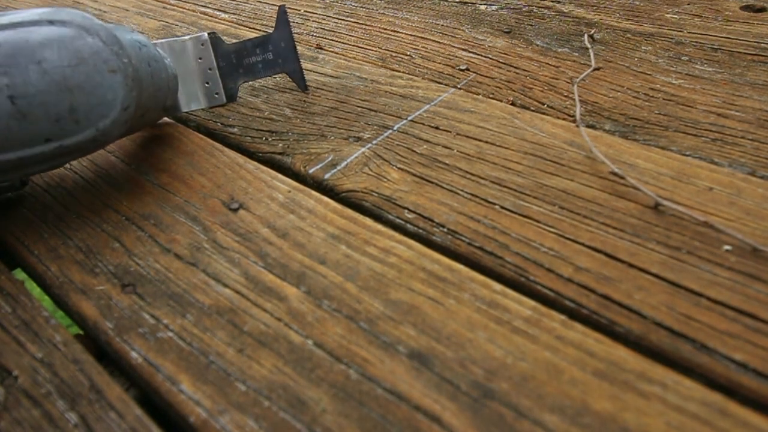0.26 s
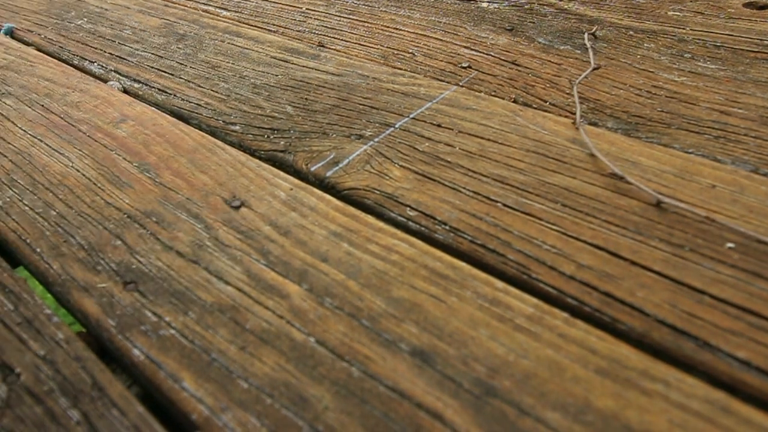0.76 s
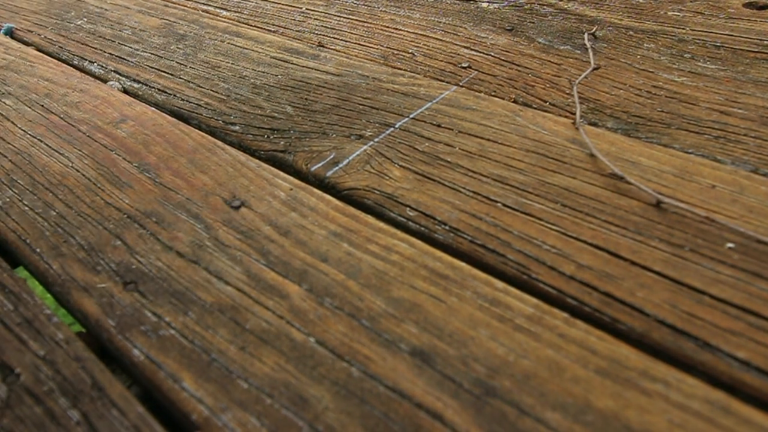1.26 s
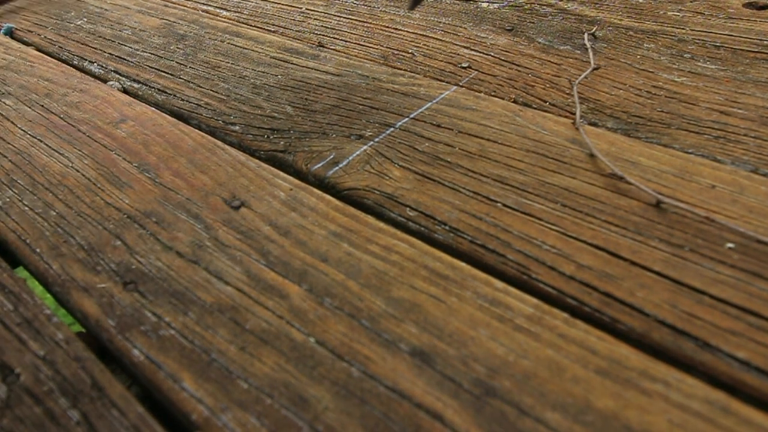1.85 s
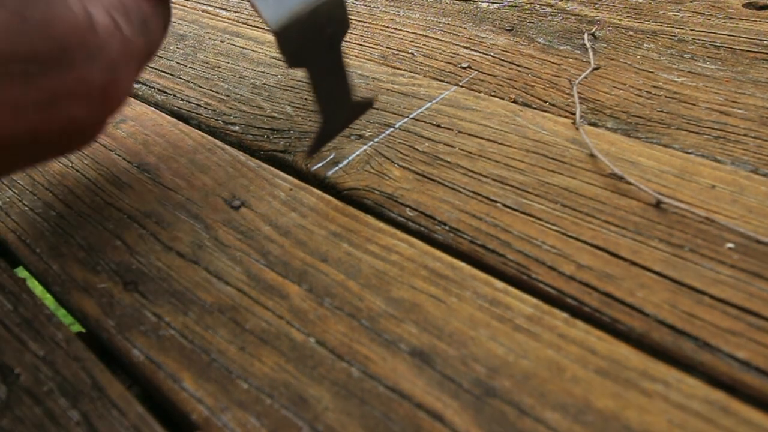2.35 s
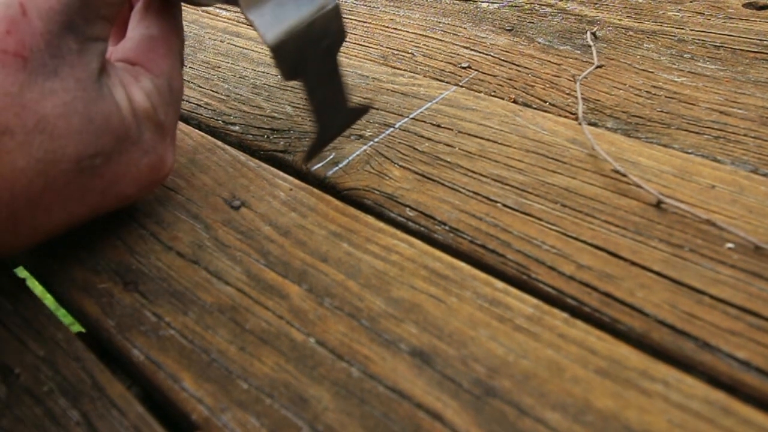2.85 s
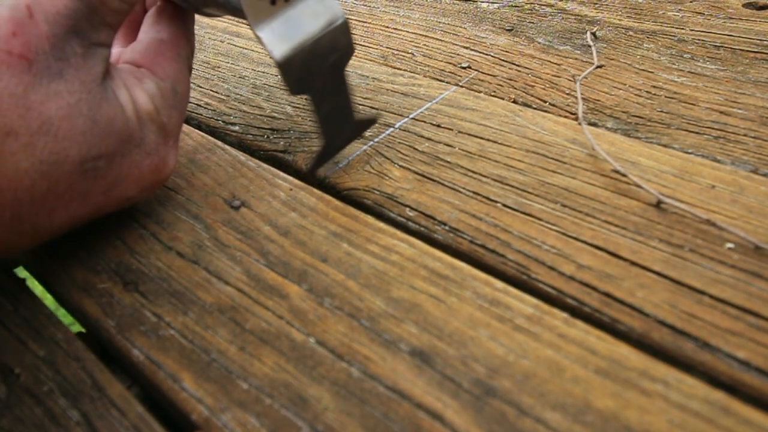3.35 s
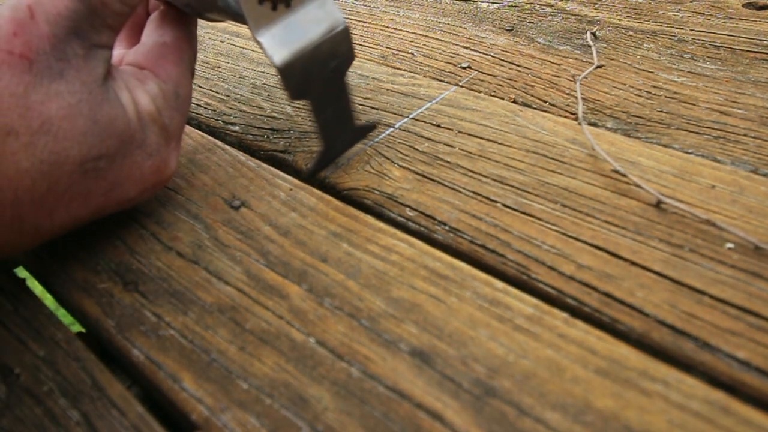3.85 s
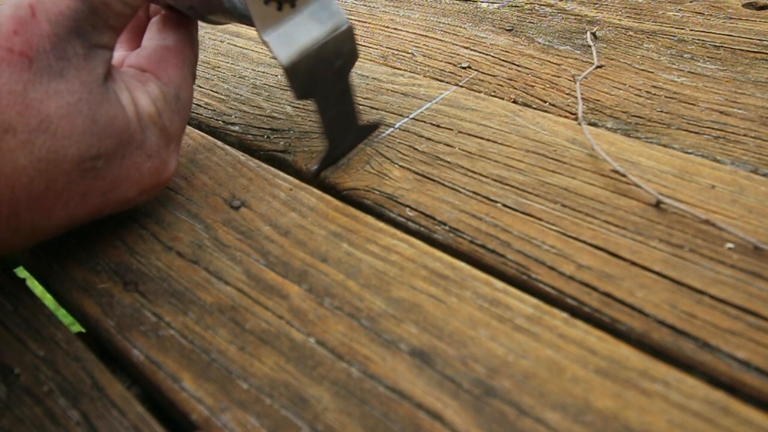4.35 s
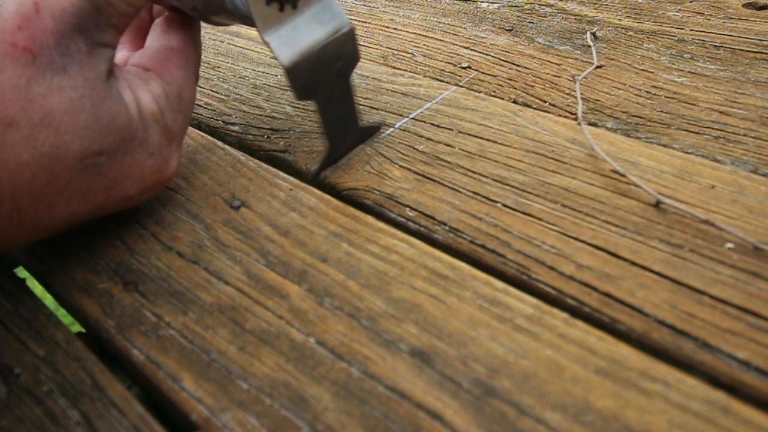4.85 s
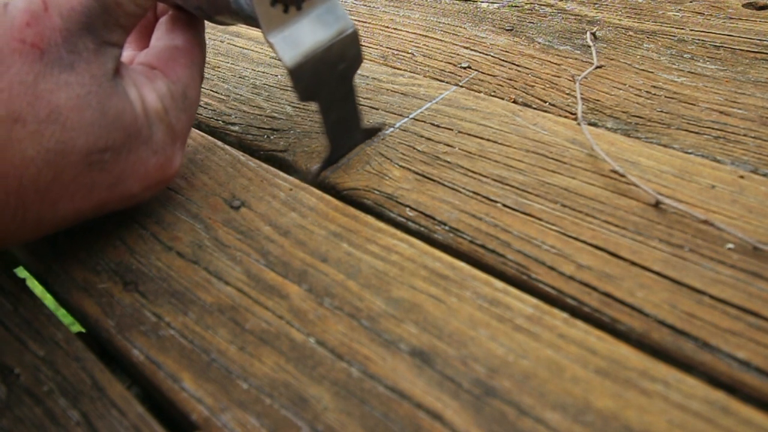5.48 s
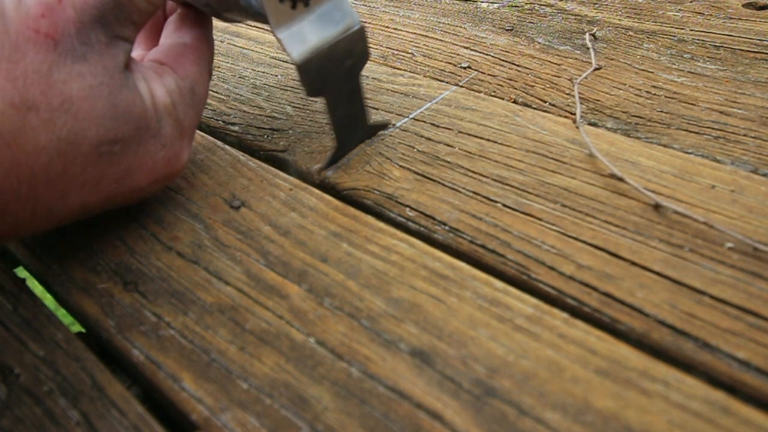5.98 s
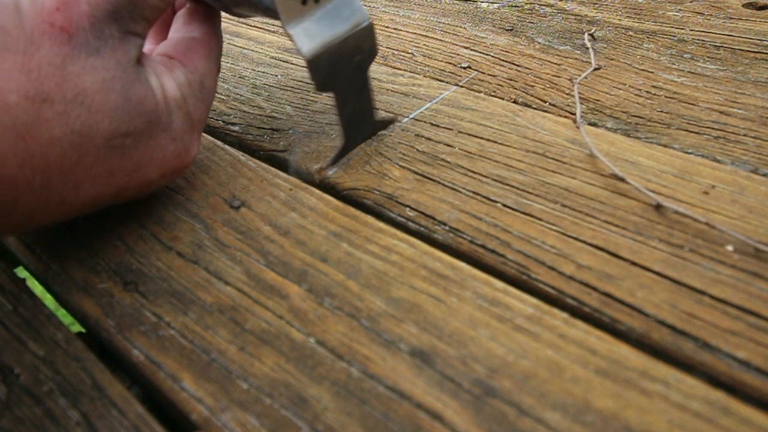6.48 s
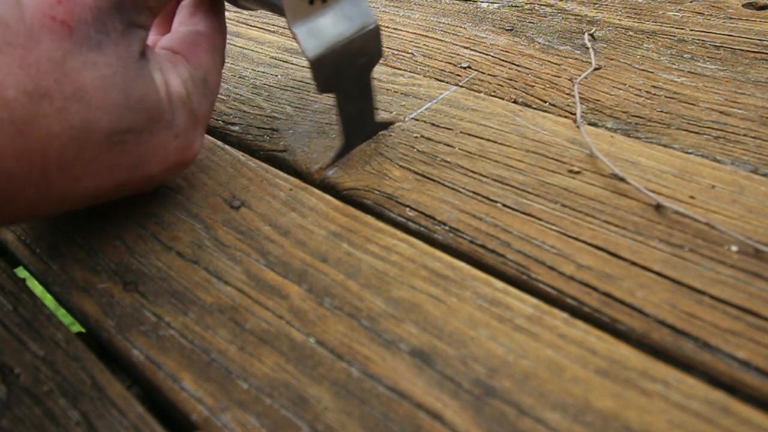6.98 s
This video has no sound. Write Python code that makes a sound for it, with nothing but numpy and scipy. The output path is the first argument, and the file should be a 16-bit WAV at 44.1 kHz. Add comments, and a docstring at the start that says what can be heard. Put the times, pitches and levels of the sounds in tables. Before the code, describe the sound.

Outdoors and very close, the first 0.6 seconds are quiet: low rumble, thin rustle, tiny scrapes and squeaks, a faint bird chirp and several light knocks on wood. At about 0.62 a power multi-tool jerks on and its buzz sweeps upward, steeply at first, settling by 1.5 to 2 seconds into a fast, bright, metallic drone with rattle, airy hiss and a thin high whine, single overtones singing out as it rises. It starts toward the left and moves nearer the middle. Around 1.6 it brightens as the blade turns. At 2.02 a hand knocks firmly on the deck. The blade bites near 3.5; from 4 the pitch sags, roughly a quarter lower by 6, while the board hums. From 5.4 to 5.9 the blade wedges and the buzz tightens into hard, regular slaps. At 6.9 it loosens, slightly faster and hissier, still running at about 7.2.

```python
"""An oscillating multi-tool is switched on and plunged into a deck board, outdoors and close by.
Stroke harmonics make its buzz and hum, noise bursts its rattle and hiss, a high multiple its commutator whine.
As the blade sinks the motor sags, the strokes tighten towards one slap each and the board hums.
A hand knocks on the deck (decaying board modes); filtered noise makes a background that drops at switch-on."""
import sys
import numpy as np
from scipy import signal
from scipy.fft import rfft, irfft, next_fast_len
from scipy.io import wavfile
from scipy.ndimage import uniform_filter1d

SR = 44100
rng = np.random.default_rng(int(sys.argv[2]) if len(sys.argv) > 2 else 0)


def inscribe(sig):
    """Save sig as 16-bit PCM at rate SR to the path in sys.argv[1].

    A 1-D sig is mono; a 2-D sig holds one channel per row.
    Samples are clipped to [-1, 1] before scaling.
    """
    pcm = np.round(np.clip(np.atleast_2d(sig).T, -1, 1) * 32767)
    wavfile.write(sys.argv[1], SR, pcm.astype(np.int16))


N = 318402
TIME = np.arange(N) / SR  # s

# Levels in the tables are starting points: layer trims, slow wander and panning come on top.
# Background before the start: (time [s], rumble [dB], rustle [dB])
BACKGROUND_LEVEL = [(0, -33.5, -41.5), (.15, -39.5, -41.5), (.2, -36.5, -46.5), (.28, -37, -47.5),
                    (.34, -38.5, -45.5), (.6, -38.5, -50.5)]
# Colour of the background rumble: (frequency [Hz], relative level [dB])
RUMBLE_COLOUR = [(20, 5), (33, -3), (54, -22), (88, 3.5), (125, -7), (350, -5.5), (1000, -14),
                 (2000, -36.5)]
# Colour of the background rustle: (frequency [Hz], relative level [dB])
RUSTLE_COLOUR = [(400, -39), (1100, -1.5), (2200, -7.5), (5000, -11.5), (8000, -17), (15000, -22)]
# Short scrapes and squeaks, and a bird's faint chirp near 3.8 kHz:
# (peak time [s], swell length [s], centre [Hz], width [Hz], level [dB])
SCRAPES_AND_CHIRP = [(0.11, 0.13, 1255, 41, -49), (0.088, 0.15, 3187, 130, -53),
                     (.09, 0.083, 3962, 500, -48), (.407, .01, 9800, 2000, -42.5),
                     (0.42, 0.045, 5300, 6000, -48), (0.58, 0.014, 3800, 40, -54)]

# Knocks on the deck: (time [s], level [dB], softness, twice the rise time of the push [ms])
KNOCKS = [(0.038, -19.5, 0.16), (.177, -23.5, 0.86), (.194, -28, .15), (0.245, -24, 0.22),
          (0.56, -29, 0.14), (2.024, -6, 0.2), (2.046, -20, 1.3)]
# Modes of the board: (frequency [Hz], relative level [dB], t60 [s])
BOARD_MODES = [(87, -20, 0.6), (134, -19, 0.2), (285, -1.5, 0.073), (370, 0, 0.037), (537, 2, 0.028),
               (670, 5, 0.026), (914, 8.5, 0.033), (1064, 9, 0.018)]

ON_S = .6235  # switch-on, s
FREE_HZ = 315.1  # full speed in the air, strokes per second
# The motor gathers speed in a jerk, a rush and a creep: (still to gain at switch-on [Hz], time constant [s])
SPIN_UP = [(40.1, .028), (137.03, .221), (25.36, .8)]
# Pressure of the cut: (time [s], stroke rate lost [Hz])
SAG = [(3.4, 0), (3.83, 2.05), (4.15, 10.5), (4.34, 13.5), (4.66, 29.5), (5.18, 47), (5.42, 63),
       (5.86, 75.5), (6.2, 75), (6.38, 78.5), (6.68, 81.5), (6.95, 72), (7.22, 76)]
MAX_STRAIN = 0.39  # limit on the share of full speed still to gain
# Blade depth: (time [s], depth [0 free in the air, 1 teeth biting, 2 buried])
DEPTH = [(3.44, 0.05), (3.53, 0.54), (3.7, .9), (4.1, 1.026), (5.2, 1.41), (5.45, 1.92), (6.87, 1.95),
         (6.93, 1.86)]
# Where the tool stands, narrowed or widened per layer: (time [s], left minus right [dB])
PLACE = [(.7, 10.5), (1.7, 5.5), (7.2, 3.5)]

# The blade is turned towards the listener: (start [s], length [s])
TURN = (1.573, 0.056)
# The hand settles on the deck and couples the tool to it: (start [s], length [s])
BRACE = (1.95, 0.38)
# The blade wedges in the cut and slaps the wood once a stroke: (start [s], length [s])
WEDGE = (5.37, 0.54)
# The pressure eases and the blade comes loose at once: (start [s], length [s])
RELEASE = (6.88, .05)
SLAP_LOCK = .52  # how far the wedged harmonics fall into step, 0-1
SLAP_SMEAR = .003  # phase lag from the board, cycles per harmonic number squared
WEDGED_BED = .24  # steady noise between the slaps, relative to their mean power

# Rocking tool and board: (stroke harmonic, free [dB], biting [dB], buried [dB],
# gained once turned [dB], gained once braced [dB])
HUM = [(1, -51, -52, -49.5, -4, 6), (2, -50, -52.5, -48.5, -6.5, 8), (3, -35.5, -27, -54, -4, -2.5),
       (4, -35.5, -43.5, -34, 3.5, 0.5)]
# A bearing cage circles at .42 of the shaft speed and, with the catching teeth, puts tones between
# the harmonics: (multiple of shaft speed, free [dB], biting [dB], buried [dB])
CAGE = [(.42, -85, -72.5, -55.5), (0.579, -77.5, -71.5, -62), (1.49, -64, -44, -96),
        (2.58, -47.5, -64, -67), (4.42, -40.5, -44, -82), (4.58, -39, -42, -67)]
# The circling cage makes strong and weak strokes: (free [share], biting [share], buried [share])
BEAT = (0.21, 0.23, 0.16)
# Deck resonances that the hum glides through: (frequency [Hz], width [Hz], lift [dB])
DECK_MODES = [(230.1, 28.4, 16), (314, 35, 7), (470.6, 26, 13.5), (549, 27, 5.5), (763, 40, 16.5)]
# The same in the body of the tool: (frequency [Hz], width [Hz], lift [dB])
BODY_MODES = [(700, 93, 7.5), (1245, 22.5, 6.8)]

# Buzz of the drive: (stroke harmonic, free [dB], biting [dB], buried [dB]), all relative
BUZZ = [(4.64, -26, -4, -11), (4.85, -8, -7, -13), (5.9, -12, -13, -5.5), (7.1, -14.5, -13.5, -9),
        (8.2, -15.5, -10.5, -9), (8.74, -8, -8.5, -14), (10.16, -14, -13.5, -12), (10.9, -13, -12.5, -14.5),
        (12.3, -15, -9, -10.5), (12.93, -13, -20, -13), (14, -22, -15, -17), (15.2, -10, -20, -10.5),
        (16, -8.5, -20, -10), (17, -10.5, -11, -22), (18.3, -9, -14.5, -22), (18.3, -14.5, -10, -9.5),
        (20.8, -16, -21, -12.5), (23.1, -17, -21, -10), (25.2, -21, -22, -16.5), (30, -17, -22, -19),
        (32.7, -12.5, -25, -19), (38, -22, -22, -21), (44.5, -26, -48, -15), (47, -45, -50, -20),
        (58.3, -49, -49, -48)]
# High ring of the buried blade: (frequency [Hz], width [Hz], lift [dB])
BURIED_MODES = [(10440, 290, 7)]
# One harmonic catches a resonance and sings, or slips off it and drops out:
# (start [s], end [s], stroke harmonic, lift [dB])
SINGS = [(.95, 1.12, 11, 5), (.97, 1.602, 9, 4.5), (0.996, 1.273, 8, 6.5), (.98, 1.142, 13, 8),
         (1.134, 1.576, 4, 4), (1.137, 1.25, 14, 7.5), (1.257, 1.56, 11, 6), (1.3, 1.46, 16, 8),
         (1.504, 1.783, 6, 3), (1.69, 1.95, 4, 3.5), (1.72, 2.147, 8, 12), (1.74, 1.934, 11, 11),
         (1.896, 2.618, 10, 6.5), (2.1, 2.398, 11, 7.5), (2.2, 2.45, 17, 3), (3.605, 3.82, 11, 7),
         (3.88, 4.05, 10, 7.5), (4.14, 4.477, 7, 9), (4.22, 4.38, 14, 5), (4.5, 4.803, 11, 8),
         (4.705, 5.266, 2, 6), (4.7, 5.277, 8, 4), (4.875, 5.2, 6, 5), (5.315, 5.46, 6, 7),
         (6.2, 6.48, 8, 3), (6.24, 6.356, 13, 9), (6.4, 6.76, 6, 1.5), (6.897, 7.2, 13, 3),
         (6.915, 7.3, 4, -7), (6.933, 7.25, 9, 6.5), (6.995, 7.3, 3, 7)]
CATCH_S = 0.08  # time to catch a resonance or let it go, s
HUM_DRIFT_DB, BUZZ_WANDER_DB = .8, 1.2  # slow wander of each harmonic, dB

# Rattle colour of the housing: (frequency [Hz], relative level [dB])
HOUSING = [(60, -37), (200, -20), (310, -18), (470, -8.5), (610, -11), (800, -1), (1200, 1), (2200, -2.5),
           (3600, 0.5), (5000, -2), (6200, -7.5), (8000, -15)]
# Housing resonances: (frequency [Hz], width [Hz], lift [dB])
HOUSING_MODES = [(710, 120, -3), (1409, 44, 3.5), (3876, 47, 6.5), (2250, 650, 4), (3057, 120, 5),
                 (4190, 117, 6)]
# Hiss of blade and cooling air: (frequency [Hz], relative level [dB])
HISS = [(3500, -29), (5000, 0.5), (6000, -0.5), (7700, -1.5), (9300, 0), (10600, 1), (12000, -6.5),
        (14000, -11), (16000, -26)]
# Blade resonances: (frequency [Hz], width [Hz], lift [dB])
BLADE_MODES = [(6020, 33, 7), (8550, 120, 7), (12500, 110, 3)]
# The wood damps some blade rings and brings out others:
# (frequency [Hz], width [Hz], free [dB], biting [dB], buried [dB])
GRIP_RINGS = [(2206, 920, -30, -30, -41.5), (2970, 200, -40, -33, -39), (4224, 200, -39, -34, -51),
              (6020, 81, -51, -33, -81), (10300, 570, -42, -60, -43)]
# Changing speed and grip make tool and blade shudder:
# (peak time [s], swell length [s], centre [Hz], width [Hz], level [dB])
SHUDDERS = [(.65, 0.02, 1180, 160, -28), (.68, 0.032, 880, 110, -25.5), (.712, 0.02, 1050, 110, -29),
            (.755, 0.039, 3130, 220, -24.5), (.95, 0.15, 3560, 700, -25.5), (.98, 0.068, 2350, 345, -26),
            (1.1, 0.043, 6020, 70, -33), (4.91, 0.088, 2250, 200, -28.5), (5.51, 0.13, 5400, 1000, -28),
            (7.06, 0.14, 7000, 700, -32), (7.16, 0.097, 5500, 600, -30)]
# Resonances that the commutator whine glides through: (frequency [Hz], width [Hz], lift [dB])
WHINE_MODES = [(9870, 140, 13), (10700, 700, -3), (10900, 330, 7)]
WHINE_ORDER, TOP_ORDER = 36, 62  # multiple of shaft speed; the buzz stops below the second
TOP_HZ = 15900  # upper edge of the sound, Hz

# Buzz level: (free [dB], biting [dB], buried [dB], gained per unit of strain [dB], gained once turned [dB])
BUZZ_LEVEL = (-25.5, -26, -24.5, -62, -0.5)
# Rattle level: (free [dB], biting [dB], buried [dB], per unit of strain [dB], once turned [dB])
RATTLE_LEVEL = (-29, -28.5, -30, 25, 2.5)
# Hiss level: (free [dB], biting [dB], buried [dB], per unit of strain [dB], once turned [dB])
HISS_LEVEL = (-33.5, -32, -33, 16, 3)
# Whine level: (free [dB], biting [dB], buried [dB], per unit of strain [dB], once turned [dB])
WHINE_LEVEL = (-46.5, -48.5, -60, 39, 8)
# Bouts of blade chatter: (peak time [s], swell length [s], more buzz [dB], more rattle [dB], more hiss [dB])
CHATTER = [(0.963, 0.018, 8, 2, 5), (1.035, 0.034, 5.5, -10, 7.5), (1.302, 0.24, 0.5, -1, 3),
           (1.687, 0.046, 1, 1, 2), (1.8, 0.033, 1, 3, 1), (4.812, 0.12, -0.5, 1.5, 2.5),
           (5.46, 0.2, 0, 4, 3), (5.93, 0.29, 0, 0, 3.5), (7.135, 0.24, -0.5, 0.5, 4.5)]


def undb(db):
    """Decibels to gain."""
    return 10 ** (np.asarray(db) / 20)


def curves(table):
    """Each column of a table of times, joined by straight lines."""
    s, *columns = np.transpose(table)
    return [np.interp(TIME, s, column) for column in columns]


def unit(x):
    """Scale to rms 1."""
    return x / np.sqrt(np.mean(x ** 2))


def lift(f, modes):
    """dB that a set of resonances adds at frequency f."""
    return sum(db / (1 + (2 * (f - centre) / width) ** 2) for centre, width, db in modes)


def colour(x, points, modes=()):
    """Filter by a smooth spectrum with resonances on top; rms 1."""
    size = next_fast_len(N, real=True)
    f = np.maximum(np.arange(size // 2 + 1) * SR / size, 1)
    hz, db = np.transpose(points)
    shape_db = np.interp(np.log(f), np.log(hz), db) + lift(f, modes)
    return unit(irfft(rfft(x, size) * undb(shape_db), size)[..., :N])


def walk(rate):
    """Random wander with a spread near 1, taking a new heading rate times a second."""
    knots = rng.standard_normal(4096)
    # the root makes up for the spread lost between knots
    return np.interp(TIME * rate, np.arange(len(knots)), knots) * np.sqrt(3 / 2)


def spread(x, pan_db):
    """Place a sound between left and right, keeping the mean of both gains."""
    right = 2 / (1 + undb(pan_db))
    return x * np.vstack([2 - right, right])


def pair(apart):
    """Left and right noise that is partly unrelated."""
    mid, side = rng.standard_normal((2, N))
    return np.array([mid + apart * side, mid - apart * side])


def swell(s, length):
    """A bell that peaks at time s and falls to 1/e one length away."""
    return np.exp(-np.minimum(((TIME - s) / length) ** 2, 50))


def rings(table):
    """Resonant bands of noise that swell and die."""
    out = np.zeros(N)
    for s, length, hz, width, db in table:
        ring = signal.lfilter(*signal.iirpeak(hz, hz / width, SR), rng.standard_normal(N))
        ring = signal.lfilter(*signal.iirpeak(hz, hz / width / 2, SR), ring)
        out += unit(ring) * undb(db) * swell(s, length)
    return out


def move(start, length):
    """A move of the hand, from 0 before it to 1 after."""
    return np.clip((TIME - start) / length, 0, 1)


def background(rumble_db=-1, rustle_db=0, after_db=-29):
    """Low rumble, rustle, short scrapes and a faint chirp, all filtered noise, turned down as the tool starts."""
    low_db, high_db = curves(BACKGROUND_LEVEL)
    rumble = colour(pair(0.78), RUMBLE_COLOUR) * undb(low_db + rumble_db)
    crackle = pair(0.85) * undb(1.1 * walk(143))
    rustle = colour(crackle, RUSTLE_COLOUR) * undb(high_db + rustle_db)
    drop_db = np.interp(TIME, [ON_S, ON_S + 0.058], [0, after_db])
    return spread(rumble + rustle + rings(SCRAPES_AND_CHIRP), 2.4) * undb(drop_db)


def knocks(pan_db=3, skew=1.64, shiver=0.46):
    """Blows ring the board, each mode differently at each ear; a softer blow leaves only the low modes."""
    out, t = np.zeros((2, N)), TIME[:SR // 2]
    bass_cut = signal.butter(2, 215, "high", fs=SR, output="sos")
    for s, db, soft_ms in KNOCKS:
        ring = 0
        for hz, mode_db, t60 in BOARD_MODES:
            ear_phase = skew * rng.standard_normal((2, 1))
            decay = np.exp(-np.log(1000) * t / t60)
            ring = ring + undb(mode_db) * np.sin(2 * np.pi * hz * t + ear_phase) * decay
        # the loose board shivers on its joists
        ring *= 1 + shiver * walk(171)[:len(t)]
        push = t * np.exp(-t * 2000 / soft_ms)
        blow = signal.fftconvolve(ring, push[None])[:, :len(t)]
        # a narrow plank radiates little bass
        blow = signal.sosfilt(bass_cut, blow)
        start = int(s * SR)
        out[:, start:start + len(t)] += undb(db) * blow / np.abs(blow).max()
    return spread(out, pan_db)


def motor():
    """Strokes per second, and the strain: the share of full speed still to gain in the spin-up, limited."""
    age = np.maximum(TIME - ON_S, 0)
    short_hz = sum(gain * np.exp(-age / lag) for gain, lag in SPIN_UP)
    return FREE_HZ - short_hz - curves(SAG)[0], np.minimum(short_hz / FREE_HZ, MAX_STRAIN)


def by_depth(depth, db):
    """Blend the free, biting and buried values."""
    return np.interp(depth, np.arange(len(db)), db)


def effort(depth, strain):
    """dB of buzz, rattle, hiss and whine, from depth of cut, spin-up strain, the turn and the chatter."""
    turned = move(*TURN)
    levels = [by_depth(depth, db) + strain_db * strain + turn_db * turned
              for *db, strain_db, turn_db in (BUZZ_LEVEL, RATTLE_LEVEL, HISS_LEVEL, WHINE_LEVEL)]
    for s, length, *more_db in CHATTER:
        bout = swell(s, length)
        for layer, db in enumerate(more_db):
            levels[layer] += db * bout
    return levels


def wedged():
    """Rises to 1 as the blade wedges in the cut, and drops to 0 as it comes loose."""
    return move(*WEDGE) - move(*RELEASE)


def sing(k):
    """dB that stroke harmonic k gains or loses as it catches a resonance or slips off it."""
    return sum(db * (move(start - CATCH_S / 2, CATCH_S) - move(end - CATCH_S / 2, CATCH_S))
               for start, end, order, db in SINGS if round(order) == k)


def partial(turns, order, lead=0):
    """A sine at a multiple of shaft speed, left ear ahead by lead radians; wedging pulls it towards step."""
    start = rng.uniform(-np.pi, np.pi) * (1 - SLAP_LOCK * wedged())
    start = start - 2 * np.pi * SLAP_SMEAR * order ** 2
    angle = 2 * np.pi * (order * turns % 1) + start + lead * np.array([[.5], [-.5]])
    return np.sqrt(2) * np.sin(angle.astype(np.float32))


def rattle(turns, scatter_db, fade_s, slop=.12, bed=0.3, return_db=-8.7, wedged_slop=0.047, wedged_return_db=-12):
    """Envelope of uneven strikes at both ends of each stroke, dying exponentially; wedging steadies them."""
    tight = wedged()
    count = np.arange(2 * int(turns[-1])) / 2  # strokes, in halves
    timing, force = rng.standard_normal((len(count), 2)).T
    held = np.interp(count, turns, tight)
    struck = count + np.interp(held, [0, 1], [slop, wedged_slop]) * timing
    at = np.interp(struck, turns, np.arange(N)).astype(int)
    # the return half of the stroke strikes more weakly
    back_db = np.interp(held, [0, 1], [return_db, wedged_return_db]) * (count % 1 > 0)
    strikes = np.zeros(N)
    strikes[at] = undb(scatter_db * np.minimum(force, 1.3) + back_db) ** 2
    power = signal.lfilter([1], [1, -np.exp(-1 / (fade_s * SR))], strikes)
    return np.sqrt(np.interp(tight, [0, 1], [bed, WEDGED_BED]) + power / power.mean())


def clatter(strikes, level_db):
    """The strikes shake noise through the resonances of the housing."""
    return colour(pair(0.54) * strikes, HOUSING, HOUSING_MODES) * undb(level_db + 0.06 + 1.46 * walk(30))


def blade_hiss(strikes, level_db):
    """Blade and cooling air: high noise pulsed by the strikes, with the blade's resonances."""
    return colour(pair(0.42) * strikes, HISS, BLADE_MODES) * undb(level_db + 1.23 + 0.72 * walk(18))


def grip_rings(strikes, depth):
    """The strikes ring the blade; which rings last depends on how deep the wood holds it."""
    out, source = 0, pair(0.15) * strikes
    for hz, width, *db in GRIP_RINGS:
        band = signal.iirpeak(hz, hz / width / 1.2, SR)
        ring = signal.lfilter(*band, signal.lfilter(*band, source))
        out = out + unit(ring) * undb(by_depth(depth, db))
    return out


def commutator_whine(turns, hz, level_db):
    """Brushes on the commutator sing at a high multiple of shaft speed, unsteady in pitch and level."""
    # the brushes bounce most while the motor is still gathering speed
    bounce = np.interp(TIME, [1, 1.8], [2, 1])
    tone = partial(turns + .002 * bounce * walk(250), WHINE_ORDER)
    tone = tone * undb(2 * bounce * (walk(40) - .3))
    return tone * undb(level_db + lift(WHINE_ORDER * hz, WHINE_MODES))


def hum(turns, hz, depth, pan_db, waver_db=1.36, low_pan=0.77, cage_waver_db=3.5, cage_pan_db=8):
    """Tool and board rock at the lowest stroke harmonics, with the bearing cage's tones between them."""
    # the board bends in another shape as the speed falls, which turns the fundamental between the ears
    leads = [np.interp(hz, [240, 295], [-.6, 1.15]), 0, .3, -.3]  # radians
    turned, braced = move(*TURN), move(*BRACE)
    out = 0
    for (order, *db, turn_db, brace_db), lead in zip(HUM, leads):
        k = round(order)
        level = by_depth(depth, db) + lift(k * hz, BODY_MODES) + turned * turn_db + sing(k)
        level += braced * (brace_db + lift(k * hz, DECK_MODES))
        tone = partial(turns, k, lead) * undb(level + waver_db * walk(25) + HUM_DRIFT_DB * walk(4.6))
        out = out + spread(tone, pan_db * (low_pan if k <= 2 else 1.5))
    for order, *db in CAGE:
        tone = partial(turns + 0.031 * walk(30), order)
        tone = tone * undb(by_depth(depth, db) + cage_waver_db * walk(12))
        out = out + spread(tone, cage_pan_db)
    # a slow drive hardly shakes the tool
    return out * undb(np.interp(hz, [170, 222], [-20, 0]))


def buzz(turns, hz, depth, pan_db, flutter_db=1.36, ring=0.99, uneven_db=0.5, slack=0.0024, skew=0.3, shade_db=-8):
    """The repeating part of each stroke; harmonics swell as they glide over housing and blade resonances."""
    orders, free_db, biting_db, buried_db = np.transpose(BUZZ)
    grid = np.linspace(0, TOP_HZ, 2000)
    resonance_db = ring * lift(grid, HOUSING_MODES + BLADE_MODES)
    free, buried = np.clip(1 - depth, 0, 1), np.clip(depth - 1, 0, 1)
    # a free blade flutters and blurs the high harmonics; deep in the wood it is held steady
    flutter = slack * (1 - buried)
    # until the blade is turned, the body of the tool shades its high harmonics
    shade = shade_db * (1 - move(*TURN))
    out, power = np.zeros((2, N)), 0
    for k in range(len(HUM) + 1, TOP_ORDER):
        # in the air the colour stays where it is at full speed, and the rising harmonics slide through it
        db = free * np.interp(k * hz / hz.max(), orders, free_db)
        db += (1 - free - buried) * np.interp(k, orders, biting_db)
        db += buried * np.interp(k, orders, buried_db)
        db += shade * np.interp(k, [15.5, 18], [0, 1])
        db += np.interp(k * hz, grid, resonance_db) + buried * lift(k * hz, BURIED_MODES)
        db += BUZZ_WANDER_DB * walk(6) + flutter_db * walk(40)
        gain = undb(db) * (k * hz < TOP_HZ)
        power = power + gain ** 2
        tone = partial(turns + flutter * walk(400), k, skew * rng.standard_normal())
        tone = tone * (gain * undb(sing(k)))
        # low harmonics lean to one side, high ones sit near the middle
        out += spread(tone, pan_db * np.interp(k, [8, 30], [1.15, .1]))
    beat = 1 + by_depth(depth, BEAT) * np.sin(2 * np.pi * CAGE[0][0] * turns)
    strength = beat * undb(uneven_db * walk(250))
    # even out the slow changes of summed power, leaving the loudness to the layer level and the singing
    return out * strength / np.sqrt(uniform_filter1d(power, SR // 8))


def tool(buzz_db=1.6, shake=0.00059):
    """The whole running tool: one unsteady shaft drives every layer from switch-on."""
    hz, strain = motor()
    (depth,), (pan_db,) = map(curves, (DEPTH, PLACE))
    stroke_db, loose_db, bright_db, commutator_db = effort(depth, strain)
    turns = np.cumsum(hz) / SR + shake * walk(45)
    strikes = rattle(turns, scatter_db=0.7, fade_s=0.0014)
    # the slack in the drive is taken up with a jolt at switch-on
    age = np.maximum(TIME - ON_S, 0)
    strikes = strikes * (1 + np.exp(-age / 0.0023))
    out = hum(turns, hz, depth, pan_db)
    out = out + buzz(turns, hz, depth, pan_db) * undb(stroke_db + buzz_db)
    out += spread(clatter(strikes, loose_db) + rings(SHUDDERS), 1.17 * pan_db)
    high = blade_hiss(strikes, bright_db) + commutator_whine(turns, hz, commutator_db)
    out += spread(high, 0.3 * pan_db)
    out += spread(grip_rings(strikes, depth), 0.83 * pan_db)
    return out * np.minimum(age / 0.00024, 1)


def scene():
    """Background, knocked deck and tool in the open air."""
    return background() + knocks() + tool()


def record(dry):
    """Round the loudest peaks softly and cut the top steeply."""
    return signal.sosfilt(signal.ellip(10, .2, 80, TOP_HZ, fs=SR, output="sos"), np.tanh(dry))


dry = scene()
out = record(dry)
inscribe(out)
```